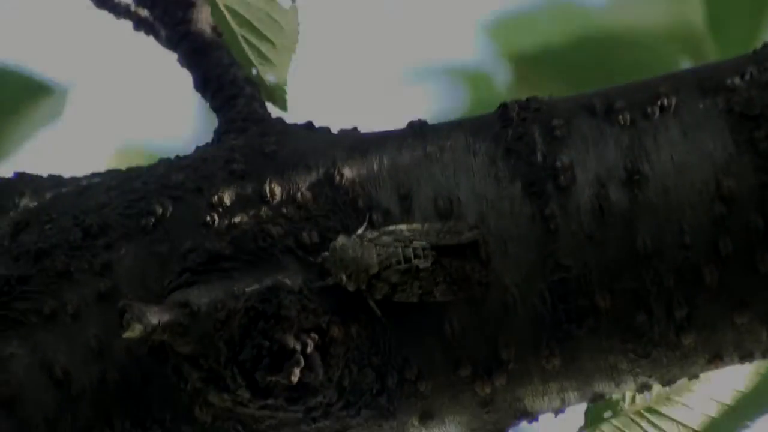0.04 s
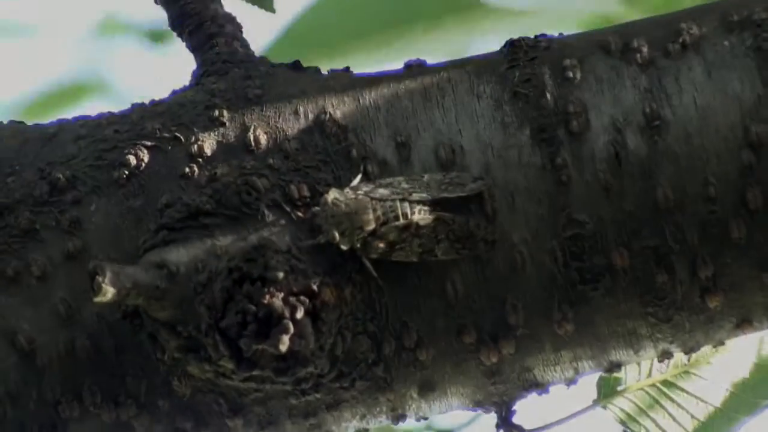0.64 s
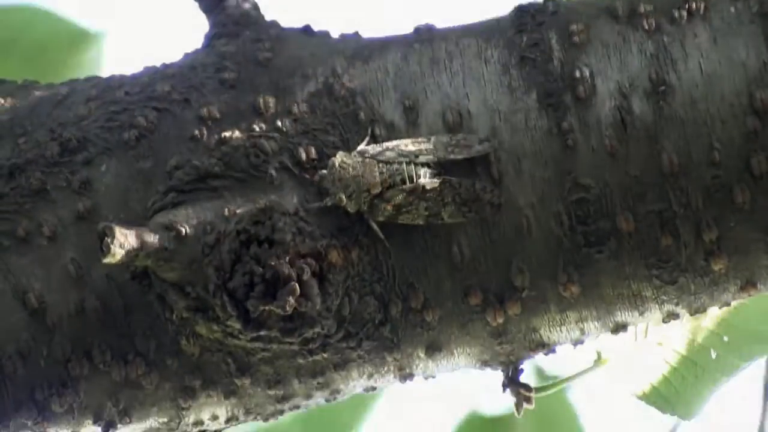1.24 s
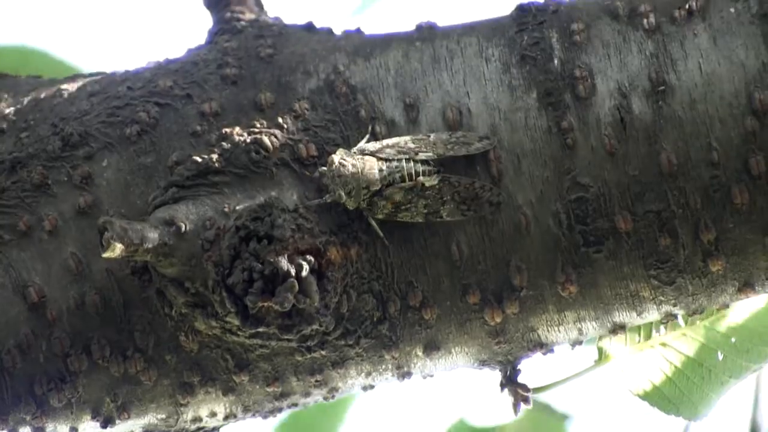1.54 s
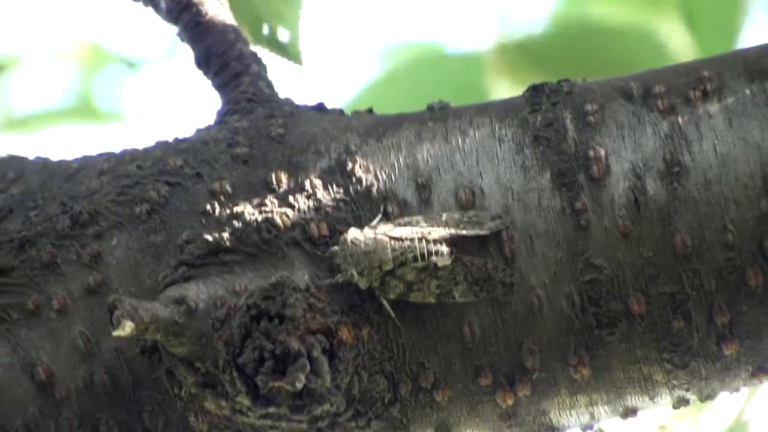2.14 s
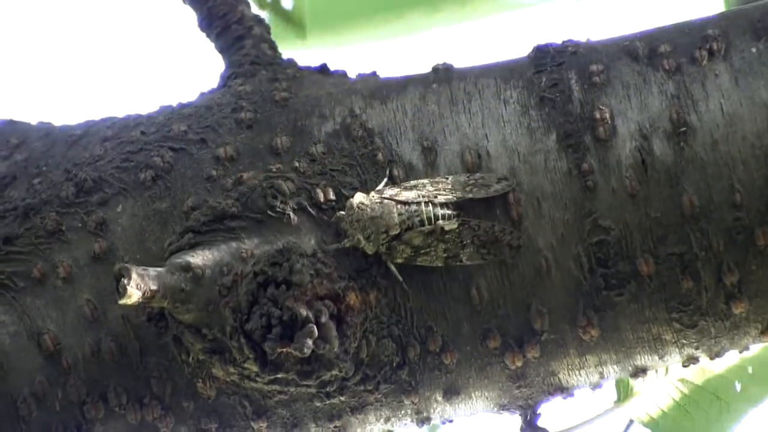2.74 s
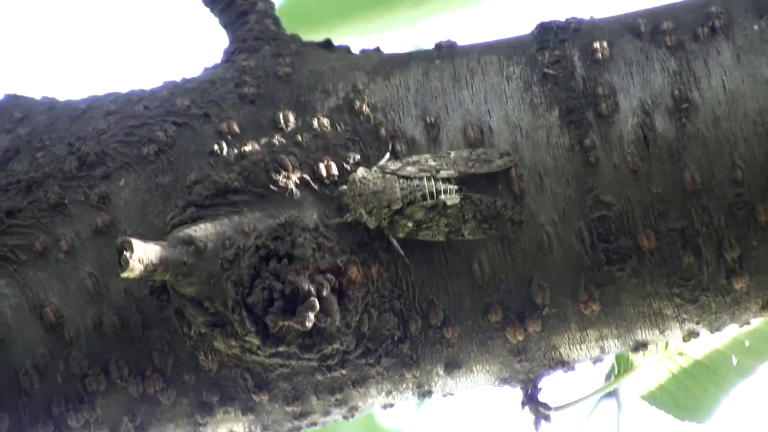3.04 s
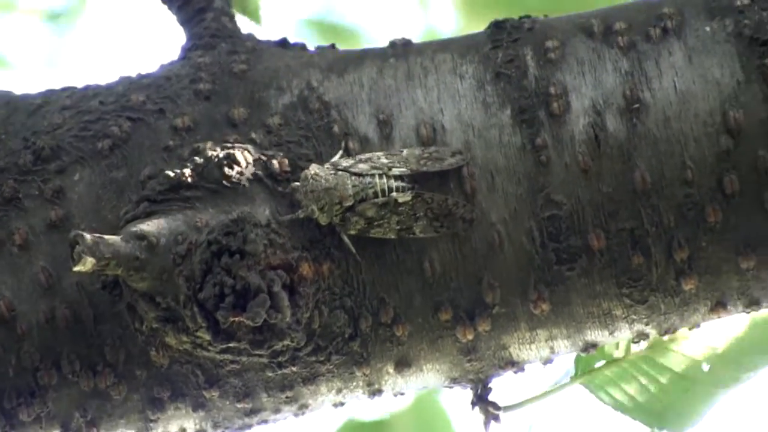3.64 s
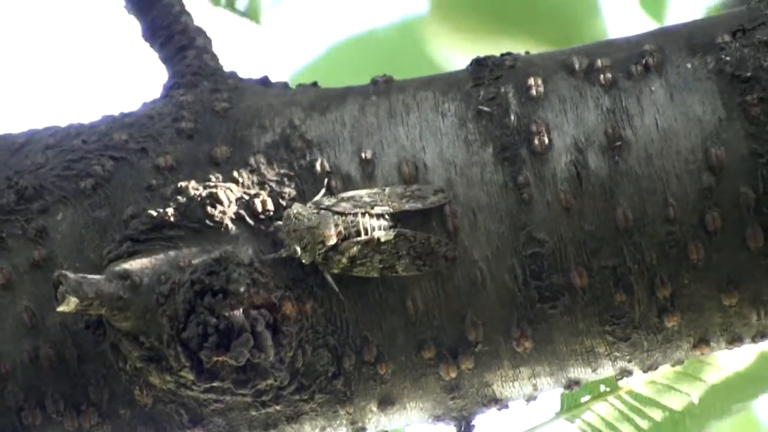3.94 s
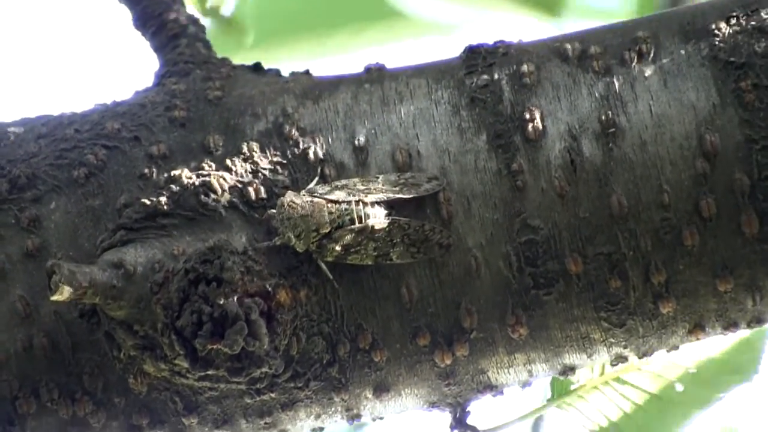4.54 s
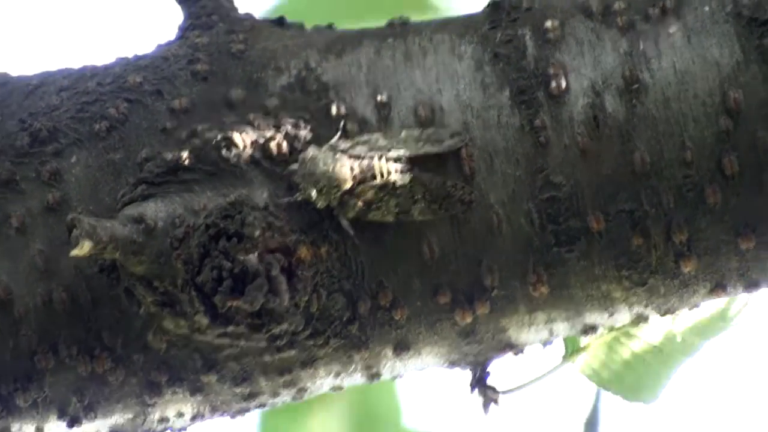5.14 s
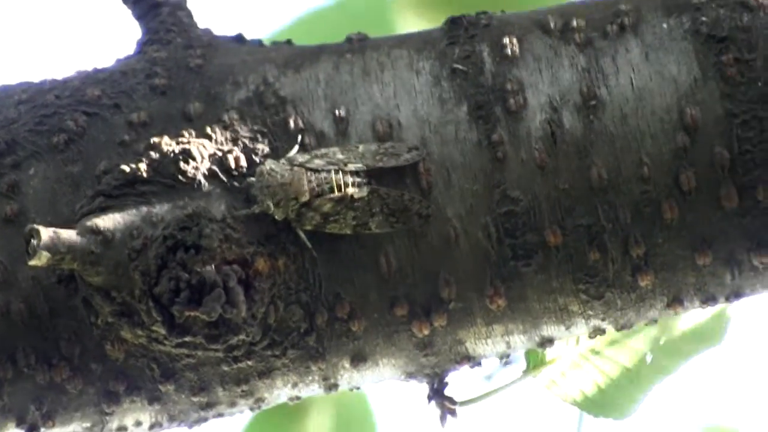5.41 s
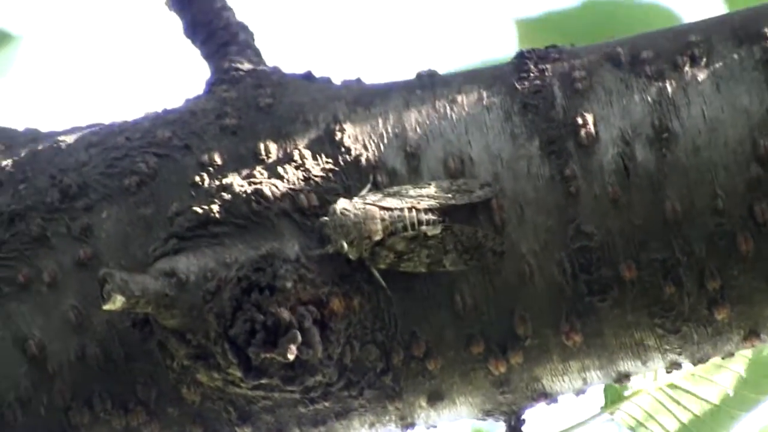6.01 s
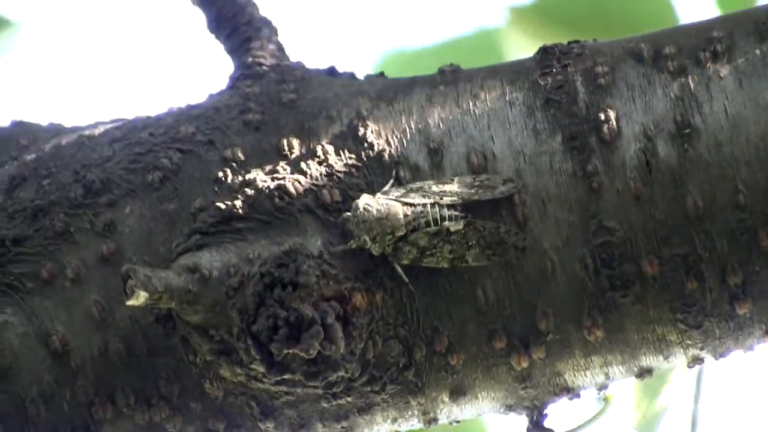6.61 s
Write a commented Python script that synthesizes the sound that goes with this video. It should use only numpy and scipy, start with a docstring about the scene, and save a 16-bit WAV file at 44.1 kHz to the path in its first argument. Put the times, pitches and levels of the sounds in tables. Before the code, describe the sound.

A close cicada buzzes continuously, gliding up to a shrill pitch and slowly sagging, over faint leaves, wind puffs and a distant engine.

```python
"""Cicada on a near branch

A close cicada buzzes low, glides up as its abdomen stretches, then sags slowly. Each snap of its
tymbals rings the hollow abdomen; bark and leaves throw the snaps back. Under it, leaves hiss, puffs of
wind brush the microphone and an engine passes far away. Late on, a thin ring joins and one tick sounds."""
import sys
import numpy as np
from scipy import signal
from scipy.fft import rfft, irfft, next_fast_len
from scipy.io import wavfile
from scipy.ndimage import map_coordinates

SR = 44100
rng = np.random.default_rng(int(sys.argv[2]) if len(sys.argv) > 2 else 0)


def file_out(sig):
    """Save sig as 16-bit WAV at sys.argv[1]."""
    # one column per channel
    cols = np.atleast_2d(sig).T
    # limit, then scale
    lim = np.clip(cols, -1, 1)
    pcm = np.round(lim * 32767).astype(np.int16)
    wavfile.write(sys.argv[1], SR, pcm)


N = 298557
TIME = np.arange(N) / SR

# pace of the song, several snaps to each muscle pull: t/s, snap rate/Hz, pull rate/Hz
SONG_PACE = [(0, 645, 57), (.5, 640, 57), (.66, 637, 89), (.72, 525, 85), (.78, 488, 88), (.95, 473, 89),
             (1.3, 461, 83), (2, 451, 76), (2.73, 443, 60), (2.88, 451, 103), (3.65, 452, 101),
             (5.5, 463, 98), (6.77, 465, 100)]
# effort of the song: t/s, relative level/dB
SONG_EFFORT = [(0, -12.7), (1.2, -12.7), (1.45, -13.8), (3.85, -13.9), (4.05, -15.2), (4.29, -13.5),
               (4.53, -14.8), (4.77, -13.7), (4.94, -15.2), (6, -13.7), (6.5, -14.8)]
# ring of the slack abdomen when tuned to SLACK_RING_HZ: f/Hz, relative level/dB
SLACK_RING = [(4100, -49), (4350, -21), (4560, -11.5), (4760, -5), (5000, -2.5), (5200, -1), (5400, 4.5),
              (5620, 0), (5840, -1.5), (6060, -8), (6480, -6.5), (6750, -12.5), (9000, -35), (10500, -36),
              (11500, -49), (12800, -52), (13600, -35), (16000, -42)]
# ring of the taut abdomen when tuned to TAUT_RING_HZ: f/Hz, relative level/dB
TAUT_RING = [(3500, -79), (5000, -37.5), (5800, -30.5), (6400, -17.5), (6850, -8.5), (7300, -1.5),
             (7800, 4.5), (8300, 3), (8800, 0), (9500, -9.5), (10200, -16.5), (11400, -54), (13000, -73),
             (22000, -77)]
# dry crackle of the tymbal ribs, whatever the tuning: f/Hz, relative level/dB
RIB_EQ = [(3000, -65), (5000, -30), (6500, -3), (8000, 9.5), (9000, 1), (10000, -6), (11500, -50),
          (15800, -35)]
# steady thin treble hiss at 9-16 kHz: f/Hz, relative level/dB
TREBLE_HISS_EQ = [(6000, -50), (9500, 3), (10500, 1.5), (11500, -6.5), (12600, -3), (14000, -10),
                  (15800, -10.5)]
# brief dull hiss near 3 kHz during the upward glide: f/Hz, relative level/dB
GLIDE_HISS_EQ = [(1000, -25), (2600, 10), (3600, 9), (6000, -5), (16000, -35)]
# early reflections off the branch and near leaves: delay/s, level/dB
BRANCH_ECHOES = [(.00125, -43), (.00165, -20), (.0029, -13), (.0054, -13.5)]
# pan of the song: t/s, left over right/dB
SONG_PAN = [(0, -2.3), (.7, -.1), (3.2, .1), (3.9, 1.9), (6.3, 1.8), (6.77, 2.5)]
# tone of an exhaust pulse: f/Hz, relative level/dB
EXHAUST_EQ = [(40, -48), (110, -25), (170, -11), (200, -5), (235, 1.5), (275, -5), (340, -12), (440, -6.5),
              (570, -13), (680, -9), (780, -14), (950, -14), (1400, -34), (3000, -48)]
# soft wash of leaves and far road: f/Hz, relative level/dB
WASH_EQ = [(25, -31), (60, -16), (120, -5), (220, -1.5), (400, 0), (800, -2), (1100, -2), (1500, -9),
           (2200, -12.5), (4000, -17), (9000, -9.5), (16000, -68)]
# fader ride of the wash: t/s, level/dB
WASH_LEVEL = [(0, -41), (.7, -38), (1.1, -44.5), (2, -38), (3.4, -37.5), (4.3, -42), (6.77, -51)]
# fine hiss of the leaves: f/Hz, relative level/dB
LEAF_EQ = [(500, -46), (1500, 6.5), (3000, 4), (6000, 3), (16000, -43)]
# wind rumble common to both microphones: f/Hz, relative level/dB
WIND_MID_EQ = [(25, -41), (50, -31), (90, -10), (140, -2), (210, 1.5), (320, -2), (480, -9.5), (800, -26),
               (1500, -49), (4000, -60)]
# wind rumble that differs between them: f/Hz, relative level/dB
WIND_SIDE_EQ = [(25, -35), (80, -20), (170, -6), (280, 5.5), (500, -7), (1000, -20), (4000, -67)]
# swelling gusts: centre t/s, half length/s, peak level/dB
WIND_GUSTS = [(0.618, .13, -36), (1.592, 0.11, -41.5), (3.1, 0.13, -38), (3.447, 0.086, -38),
              (5.95, 0.24, -47)]
# single sharp puffs: t/s, peak level/dB
WIND_PUFFS = [(0.138, -31), (0.463, -29.5), (0.549, -35), (1.222, -38), (1.514, -40), (1.68, -38),
              (2.279, -41), (3.044, -35), (3.167, -31), (3.39, -36), (5.433, -47), (5.676, -40.5),
              (5.965, -35.5), (6.172, -39), (6.288, -40.5), (6.639, -36.5)]
# narrow band of the distant ring: f/Hz, relative level/dB
FAR_RING_EQ = [(4800, -50), (5400, -6), (5570, -4), (5750, -17), (6500, -45)]

SLACK_RING_HZ, TAUT_RING_HZ = 5670, 8120


def gain_of(db):
    """Decibels to amplitude."""
    return 10 ** (np.asarray(db) / 20)


def unit_rms(x):
    """Scales to rms 1."""
    return x / np.sqrt(np.mean(x ** 2) + 1e-20)


def blend(start, end, amount):
    """Moves from start to end as amount goes from 0 to 1."""
    return start + (end - start) * amount


def follow(rows, t=TIME):
    """The columns of an automation curve at times t."""
    times, *columns = np.transpose(rows)
    return [np.interp(t, times, column) for column in columns]


def eq_db(eq, hz):
    """Level of an EQ curve at the given frequencies."""
    f, db = np.transpose(eq)
    return np.interp(np.log(hz + 1), np.log(f + 1), db)


def bell(at_s, width_s, t=TIME):
    """A smooth hump of height 1 around at_s."""
    return np.exp(-((t - at_s) / width_s) ** 2)


def step(at_s, width_s, t=TIME):
    """A smooth rise from 0 to 1 around at_s."""
    return .5 + .5 * np.tanh((t - at_s) / width_s)


def add(mix, at_s, sound):
    """Drops a sound into the mix at at_s."""
    part = mix[max(round(at_s * SR), 0):][:len(sound)]
    part += sound[:len(part)]


def noise(eq):
    """Noise of rms 1 shaped by an EQ curve."""
    padded = next_fast_len(N, True)
    hz = np.fft.rfftfreq(padded, 1 / SR)
    spectrum = rfft(rng.standard_normal(padded)) * gain_of(eq_db(eq, hz))
    return unit_rms(irfft(spectrum, padded)[:N])


def wander(per_s):
    """Smooth random modulation of rms 1 that changes about per_s times a second."""
    knots, coarse = rng.standard_normal(4096), TIME[::64]
    curve = map_coordinates(knots, [coarse * per_s], order=3, mode="wrap")
    return unit_rms(np.interp(TIME, coarse, curve))


def ring_spectrum(db, bite=1):
    """Spectrum of a ring with these levels along the last axis; bite 1 starts at once, less swells in."""
    log_gain = np.log(gain_of(np.concatenate([db, db[..., -2:0:-1]], -1)))
    phase = -bite * signal.hilbert(log_gain).imag
    return np.exp(log_gain + 1j * phase)[..., :db.shape[-1]]


def colour(x, eq):
    """Lets x ring through a body with the given EQ curve."""
    hz = np.fft.rfftfreq(2048, 1 / SR)
    return signal.oaconvolve(x, irfft(ring_spectrum(eq_db(eq, hz))))[:N]


def formant(x, hz, width_hz):
    """Two resonators in series, each width_hz wide, that follow the curve hz; rms 1 out."""
    carrier = np.exp(2j * np.pi * np.cumsum(hz) / SR)
    pole = np.exp(-np.pi * width_hz / SR)
    for _ in range(2):
        x = 2 * (carrier * signal.lfilter([1 - pole], [1, -pole], x / carrier)).real
    return unit_rms(x)


def stretched(t=TIME, at_s=.657, rise_s=.088):
    """The abdomen's one quick stretch: 0 slack, 1 taut."""
    return 1 - np.exp(-(np.maximum(t - at_s, 0) / rise_s) ** 1.2)


def stumbling(t=TIME):
    """The song's brief stumble during the stretch, 0 to 1."""
    return bell(.74, .064, t)


def snaps(sway_s=3.6e-5, slack_sway_s=8e-6, jitter_s=1.1e-5):
    """Times and strengths of the snaps: they hurry and lag with every pull of the muscles."""
    unsteady = .0016 + .00092 * (1 - stretched())
    count = np.cumsum(follow(SONG_PACE)[0] * (1 + unsteady * wander(35))) / SR
    times = np.interp(np.arange(int(count[-1]) + 1), count, TIME)
    jitter, accent, slip = rng.standard_normal((len(times), 3)).T
    snap_hz, pull_hz = follow(SONG_PACE, times)
    pull_phase = 2 * np.pi * np.cumsum(pull_hz / snap_hz + .007 * slip)
    scatter_db = .5 + 5.5 * stumbling(times)
    strength_db = scatter_db * np.minimum(accent, .5) + .33 * np.sin(pull_phase)
    lag = np.cos(pull_phase) + .35 * np.cos(2 * pull_phase)  # a lopsided lurch within each pull
    sway = sway_s + slack_sway_s * (1 - stretched(times))
    looseness = 1 - .5 * bell(1.05, .35, times)  # tightest while the high note is fresh
    return times + looseness * (sway * lag + jitter_s * jitter), gain_of(strength_db)


def abdomen(tuned_hz, hz, body_hz=6100):
    """Response in dB for each snap: several narrow modes when slack, one broad mode when taut."""
    slack_db = eq_db(SLACK_RING, hz * SLACK_RING_HZ / tuned_hz[:, None])
    taut_db = eq_db(TAUT_RING, hz * TAUT_RING_HZ / tuned_hz[:, None])
    morph = np.interp(tuned_hz, [5800, 7200], [0, 1])[:, None]
    body = gain_of(-39) / (1 + ((hz - body_hz) / 430) ** 2)  # a faint mode that holds its pitch
    power = gain_of(blend(slack_db, taut_db, morph)) ** 2 + body ** 2
    return 10 * np.log10(power / np.mean(power, 1, keepdims=True))


def tymbals(low_hz=5720, high_hz=8243, sag_hz=356.7, shimmer_hz=16.5, crackle_s=.0015):
    """Two tymbals snap in turn; gives the abdomen's ringing tone and the crackle of the ribs."""
    times, strength = snaps()
    taut = stretched(times)
    tuned_hz = blend(low_hz, high_hz, taut) - sag_hz * step(4.02, 1.3, times)
    shimmer_phase = 2 * np.pi * shimmer_hz * times + 2.5 * np.interp(times, TIME, wander(6.2))
    shimmer = (1 - taut) * np.sin(shimmer_phase)  # the slack abdomen wobbles in pitch and level
    drift = .006 * np.interp(times, TIME, wander(7))
    detune = .002 * (-1) ** np.arange(len(times))  # the two tymbals sit slightly apart
    scatter = .0025 * rng.standard_normal(len(times))
    tuned_hz *= 1 + drift + .013 * shimmer + detune + scatter
    size = 640  # samples per ring
    lead = size // 2  # pre-roll for each ring to swell in
    hz = np.fft.rfftfreq(size, 1 / SR)
    delay_s = times - np.round(times * SR) / SR + lead / SR  # places each ring between samples
    spectra = ring_spectrum(abdomen(tuned_hz, hz), bite=.47)
    rings = irfft(spectra * np.exp(-2j * np.pi * hz * delay_s[:, None]))
    bursts = rng.standard_normal(rings.shape) * np.exp(-np.arange(size) / SR / crackle_s)
    snap_hz = follow(SONG_PACE, times)[0]
    forces = strength * gain_of(.4 * shimmer) / np.sqrt(snap_hz)
    tone, crackle = np.zeros(N + size), np.zeros(N)
    for at_s, force, ring, burst in zip(times, forces, rings, bursts):
        add(tone, at_s, force * ring)
        add(crackle, at_s, force * burst)
    return unit_rms(tone[lead:][:N]), unit_rms(colour(crackle, RIB_EQ))


def treble_hiss(flicker_db=1.6, fade_db_per_s=1.3):
    """A steady thin treble hiss that swells at the glide, then fades."""
    level_db = blend(-31, -17, stretched()) + 10 * stumbling() - fade_db_per_s * TIME
    return gain_of(level_db + flicker_db * wander(11)) * noise(TREBLE_HISS_EQ)


def glide_hiss(relative_db=-29.5):
    """A brief dull hiss near 3 kHz during the upward glide."""
    return gain_of(relative_db) * stumbling() * noise(GLIDE_HISS_EQ)


def cicada(trim_db=-.55, waver_db=.38):
    """The ringing buzz, with more crackle once the abdomen is taut; two hiss layers ride the same fader."""
    tone, crackle = tymbals()
    crackle_db = blend(-15, -11.5, stretched())
    layers = tone + gain_of(crackle_db) * crackle + treble_hiss() + glide_hiss()
    level_db = follow(SONG_EFFORT)[0] + trim_db - 3 * stumbling() + waver_db * wander(12)
    return layers * gain_of(level_db)


def foliage(x, t60_s=.21):
    """A diffuse reverb tail scattered by the leaves."""
    t = np.arange(SR * 2 // 3) / SR
    tail = rng.standard_normal(len(t)) * gain_of(-60 * t / t60_s) * (t > .002)
    return signal.oaconvolve(x, tail / np.linalg.norm(tail))[:N]


def tree(song, grove_db=-23, width_db=-17, drift_s=6e-5):
    """Sets the song in stereo among near echoes off bark and leaves and the long tail of the grove."""
    wet = song + gain_of(grove_db) * foliage(song, t60_s=1)
    for delay_s, db in BRANCH_ECHOES:
        echo_time = TIME - delay_s - drift_s * wander(2.5)  # the hand-held microphone drifts
        wet += gain_of(db) * np.interp(echo_time, TIME, song, left=0)
    pan_db = follow(SONG_PAN)[0]
    pair = wet * gain_of(np.array([pan_db, -pan_db]) / 2)
    pair[0] = .8 * pair[0] + .33 * np.roll(pair[0], 1)  # the left microphone is a hair farther away
    return pair + gain_of(width_db) * np.array([foliage(song), foliage(song)])


def engine(nearest_s=3.7, pass_s=1.0, firing_hz=39.45, doppler=.056):
    """A far pass-by: breathy pulses drive exhaust, clatter and rasp, dropping in pitch as it goes by."""
    along = (TIME - nearest_s) / pass_s
    distance = np.hypot(1, along)  # 1 at the nearest point
    rate_hz = firing_hz * (1 - doppler * along / distance) * (1 + .00064 * wander(20))
    firings = np.cumsum(rate_hz) / SR
    pulses = unit_rms(np.diff(np.floor(firings), prepend=0))
    breath = unit_rms(rng.standard_normal(N) * np.exp(-(firings % 1) / .29))
    drive = pulses + .22 * breath
    drive += gain_of(-12) * foliage(drive)
    doublings = np.log2(distance)
    exhaust = gain_of(-37.6 - 10 * doublings) * unit_rms(colour(drive, EXHAUST_EQ))
    # the block clatters from the front; the rasp takes over once the tailpipe faces the microphone
    from_behind = step(3.35, .07)
    clatter_db = -37.5 - 10 * doublings - 16 * from_behind
    rasp_db = -37.3 - 8.5 * doublings - 16 * (1 - from_behind)
    clatter_hz, rasp_hz = np.full(N, 500), blend(1190, 895, step(nearest_s, .26))
    clatter = gain_of(clatter_db) * formant(drive, clatter_hz, width_hz=400)
    rasp = gain_of(rasp_db) * formant(drive, rasp_hz, width_hz=250)
    return exhaust + colour(clatter + rasp, [(100, -31.5), (400, -3)])  # low cut and a slight trim


def air(flutter_db=1, start_db=-45.5, calm_db=-53, settle_s=1.23):
    """A soft outdoor bed, topped by leaf hiss that dies down."""
    wash = noise(WASH_EQ) * gain_of(follow(WASH_LEVEL)[0] + flutter_db * wander(50))
    leaves_db = blend(start_db, calm_db, 1 - np.exp(-TIME / settle_s))
    return wash + noise(LEAF_EQ) * gain_of(leaves_db)


def wind(breeze_db=-51, lumps_db=3, side_db=-16.5, puff_rise_s=.008):
    """Lumpy low eddies on the microphone: a light breeze with one lull, a few gusts and sharp puffs."""
    breeze = gain_of(breeze_db - 34 * bell(4.44, .68))
    gusts = sum(gain_of(db) * bell(at_s, half_s) for at_s, half_s, db in WIND_GUSTS)
    envelope = (breeze + gusts) * gain_of(lumps_db * wander(60))
    puff_age = np.arange(SR // 8) / SR / puff_rise_s
    for at_s, db in WIND_PUFFS:
        add(envelope, at_s, gain_of(db) * puff_age * np.exp(1 - puff_age))
    mid, side = noise(WIND_MID_EQ), gain_of(side_db) * noise(WIND_SIDE_EQ)
    return envelope * np.array([mid + side, mid - side])


def far_ring(at_s=4.6, rise_s=.55, level_db=-49.5):
    """A thin, steady ring of narrow noise fades in, perhaps a far cicada."""
    return noise(FAR_RING_EQ) * gain_of(level_db) * step(at_s, rise_s)


def tick(at_s=6.021, level_db=-16, decay_s=7e-5):
    """One tiny dry click."""
    track, t = np.zeros(N), np.arange(SR // 100) / SR
    add(track, at_s, gain_of(level_db) * np.exp(-t / decay_s))
    return track


def scene():
    """The cicada up front in its tree, over a quiet outdoor backdrop."""
    return tree(cicada()) + far_ring() + engine() + air() + wind() + tick()


def record(dry):
    """A steep master low-pass trims the very top."""
    lowpass = signal.firwin(511, 15850, window=("kaiser", 9), fs=SR)
    return signal.oaconvolve(dry, lowpass[None], "same")


dry = scene()
out = record(dry)
file_out(out)
```